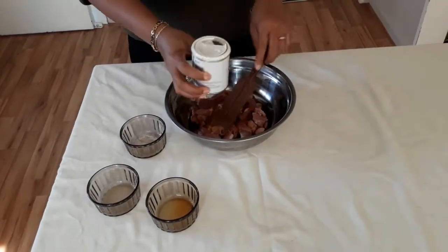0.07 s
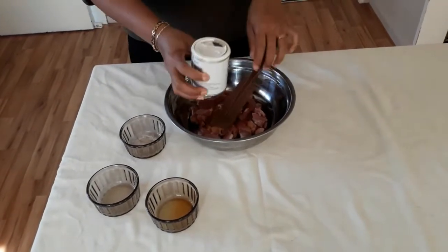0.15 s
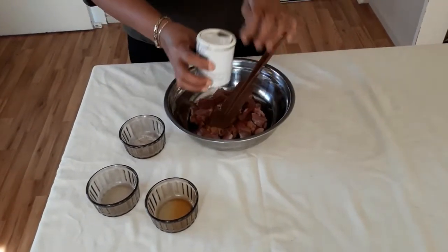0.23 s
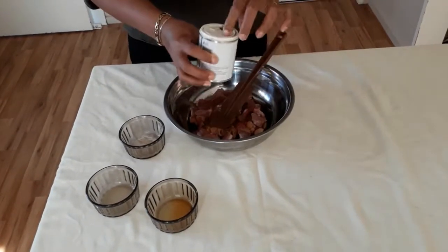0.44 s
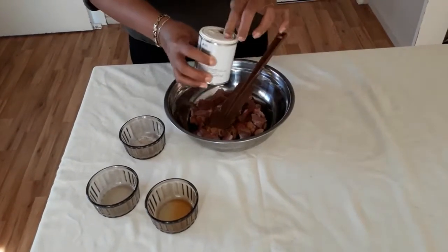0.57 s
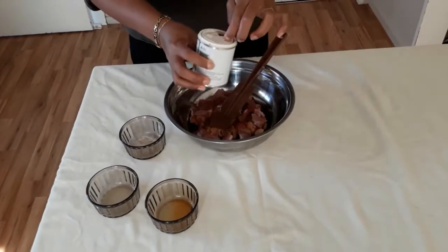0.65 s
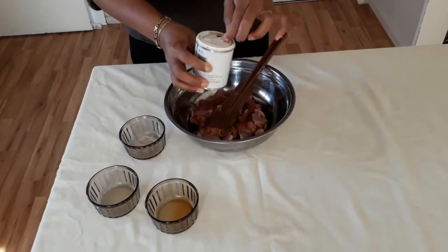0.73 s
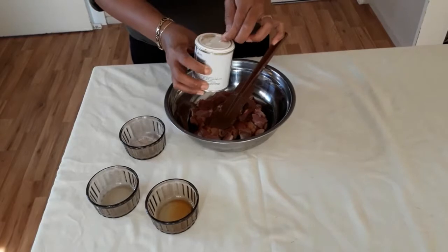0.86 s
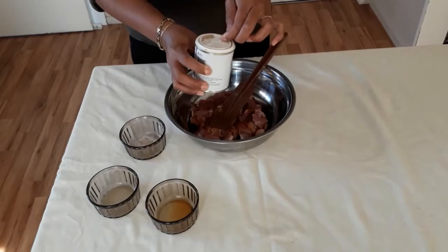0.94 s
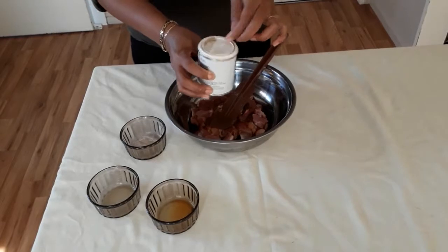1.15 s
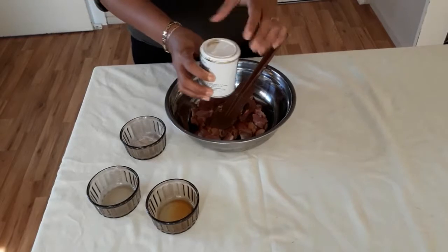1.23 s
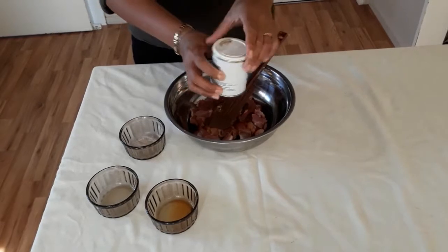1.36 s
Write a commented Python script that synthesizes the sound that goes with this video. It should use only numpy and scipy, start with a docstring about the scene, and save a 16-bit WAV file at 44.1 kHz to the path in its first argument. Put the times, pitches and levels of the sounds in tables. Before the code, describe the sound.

A spatula drops on the rim of a steel bowl with one loud, bright clink and quick rebound, ringing briefly; then a dull hollow knock on a cardboard canister and faint lid scratching in a quiet small kitchen.

```python
"""Spatula on a bowl, hand on a canister

A spatula drops against the rim of a steel bowl: a light touch, a clink and a quick rebound.
Each contact is a noise crack, dense noise clatter and damped modes, some in beating pairs.
A hand knocks on a cardboard canister (noise burst, hollow modes) and scratches its lid (random
slips), which clicks, and pops twice. A small kitchen answers knock and lid over low room noise."""
import sys
import numpy as np
from scipy import signal
from scipy.fft import rfft, irfft
from scipy.io import wavfile

SR = 44100
rng = np.random.default_rng(int(sys.argv[2]) if len(sys.argv) > 2 else 0)


def generate_wav(sig):
    """Save sig (samples, or channels by samples) to the path in sys.argv[1] as 16-bit PCM at SR."""
    pcm = np.round(np.clip(np.atleast_2d(sig).T, -1, 1) * 32767).astype(np.int16)
    wavfile.write(sys.argv[1], SR, pcm)


N = 61739
T = np.arange(N) / SR


def amp(db):
    """Decibels to gain."""
    return 10 ** (np.asarray(db) / 20)


def unit(x):
    """Scales to rms 1."""
    return x / np.sqrt(np.mean(abs(x) ** 2) + 1e-20)


def read(points, hz):
    """Reads a table along a log-frequency axis."""
    f, value = np.transpose(points)
    return np.interp(np.log(hz + 1), np.log(f), value)


def gain_curve(points, outside_db=None):
    """Gain over time from (s, dB) points; holds the end levels unless outside_db is given."""
    return amp(np.interp(T, *np.transpose(points), left=outside_db, right=outside_db))


def delayed(x, s):
    """Starts a sound at time s."""
    return np.concatenate([np.zeros(max(round(s * SR), 0)), x])[:N]


def coloured(x, colour, tilt_db=0):
    """Gives a steady signal a spectrum, tilted in dB per octave, at rms 1."""
    hz = np.fft.rfftfreq(N, 1 / SR)
    gain_db = read(colour, hz) + tilt_db * np.log2(hz + 1)
    return unit(irfft(rfft(x) * amp(gain_db), N))


def noise(colour, tilt_db=0):
    """Coloured noise of rms 1."""
    return coloured(rng.standard_normal(N), colour, tilt_db)


def decay(t60, t=T):
    """Falls by 60 dB in t60 seconds."""
    return np.exp(-np.log(1000) * t / np.maximum(t60, 1e-4))


def dying(x, t60s):
    """Lets each band of a steady signal die at its own speed."""
    hz, t, z = signal.stft(x, SR, nperseg=512, noverlap=384)
    z = z * decay(read(t60s, hz)[:, None], t)
    return signal.istft(z, SR, nperseg=512, noverlap=384)[1][:N]


def rippled(x):
    """Gathers a dense spectrum into narrow random peaks and dips, at rms 1."""
    ripple_db, width_hz = 4.5, 35
    hz = np.fft.rfftfreq(N, 1 / SR)
    knots_hz = np.arange(0, SR / 2, width_hz)
    ripple = np.interp(hz, knots_hz, np.clip(rng.standard_normal(len(knots_hz)), -2, 2))
    return unit(irfft(rfft(x) * amp(ripple_db * ripple), N))


def ring(modes):
    """Damped modes that swell and waver in level and phase as reflections join them."""
    waver_depth, waver_hz = .12, 23.1
    knots_s = np.arange(128) / waver_hz
    out = np.zeros(N)
    for hz, db, t60_s, rise_s in modes:
        a, b = rng.standard_normal((2, len(knots_s)))
        waver = 1 + waver_depth * np.interp(T, knots_s, a + 1j * b)
        tone = (waver * np.exp(2j * np.pi * hz * T)).imag
        out += amp(db) * decay(t60_s) * (1 - np.exp(-T / rise_s)) * tone
    return out


def struck(modes, rise_s):
    """Rings modes that share one rise time."""
    return ring([(*mode, rise_s) for mode in modes])


def bowl():
    """Each contact gives a crack, a dense clatter and the long ring of the steel."""
    # spatula on the rim: t/s, ring/dB, clatter/dB, crack/dB
    clinks = [(0.1691, -47, -30, -64), (.2032, -0.5, 0, 1), (0.2106, -33, -7, 3)]
    # dense upper modes, blurred by the room: f/Hz, relative level/dB per Hz
    clatter_colour = [(25, -61), (60, -37), (140, -12.5), (300, -15.5), (520, -17.5), (800, -5), (1250, 1),
                      (1700, -5.5), (2200, -1.5), (2700, -8), (3200, -9), (3700, 7.5), (4400, -19),
                      (5300, -5.5), (6500, -14), (7400, -9), (7900, -17), (10000, -14), (12000, -22),
                      (14000, -17.5), (16000, -29)]
    # clatter decay: f/Hz, t60/s
    clatter_t60 = [(100, .6), (500, 0.61), (1200, 0.61), (3000, .42), (6000, 0.49), (10000, 0.28),
                   (15000, .27)]
    # the contact itself: f/Hz, relative level/dB per Hz
    crack_colour = [(25, -52), (70, -25), (300, -13.5), (700, -12), (1300, 8.5), (2600, -6.5), (4000, -2),
                    (8000, -33.5), (10300, -14), (12000, -22.5), (15000, -13)]
    # short ping of the first touch, with faint high bowl modes: f/Hz, level/dB, t60/s
    touch = [(1992, -36.5, .055), (5186, -54, .15), (5627, -62, .15), (8088, -65, .13)]
    # bowl rocking on the table: f/Hz, relative level/dB, t60/s, rise/s
    thud = (152, -35, .3, .05)
    clatter_base_db, crack_base_db, crack_t60_s = -22.5, -15.5, 0.0096
    touch_s = .1695
    tone = steel() + ring([thud])
    out = np.zeros(N)
    for s, ring_db, clatter_db, crack_db in clinks:
        clatter = dying(rippled(noise(clatter_colour)), clatter_t60)
        clatter = amp(clatter_base_db + clatter_db) * clatter
        crack = amp(crack_base_db + crack_db) * noise(crack_colour) * decay(crack_t60_s)
        out += delayed(amp(ring_db) * tone + clatter + crack, s)
    return out + delayed(struck(touch, rise_s=0.0015), touch_s)


def steel():
    """Modal ring of the bowl after one contact; its loudest group dips and swells."""
    # modes of the bowl: f/Hz, relative level/dB, t60/s, rise/s
    bowl_modes = [(967, -24.5, .6, .04), (979, -34, .68, .005), (1242, -36, 1.05, .005),
                  (1260, -19.5, .18, .002), (1368, -38, .55, .005), (1486, -25, .14, .002),
                  (1960, -24.5, .34, .003), (2114, -44, .9, .005), (2257, -8, .37, .09),
                  (2278, -34, .56, .005), (2289, -26, .64, .03), (3379, -32, .36, .005),
                  (3439, -21, .38, .005), (3497, -22, .17, .005), (3585, -21, .38, .005),
                  (3596, -9, .27, .008), (3624, -23.5, .72, .005), (4008, -36, .62, .005),
                  (4075, -15.5, .31, .006), (4136, -33, .94, .005), (4183, -32, .36, .005),
                  (4398, -44, .74, .005), (4647, -21, .21, .005), (4734, -27, .49, .01),
                  (4970, -36, .55, .005), (5197, -23, .19, .003), (5219, -42, .75, .005),
                  (5365, -25.5, .44, .005), (5445, -43, .75, .005), (5607, -33, .28, .005),
                  (5933, -46, .68, .005), (6025, -36, .33, .005), (6115, -33, .44, .005),
                  (6280, -41, .55, .005), (6485, -46, .7, .005), (6826, -39, .46, .005),
                  (7270, -33, .3, .005), (7760, -50, .66, .005), (10015, -56, .65, .005)]
    # gain of the loudest group: t/s after contact, level/dB
    swell = [(0, -1.5), (.036, 2.5), (.05, -1.5), (.061, -2.5), (.071, 4), (.078, 6.5), (.088, -6),
             (.11, 2)]
    low_hz, high_hz = 3300, 3700
    loudest = [mode for mode in bowl_modes if low_hz < mode[0] < high_hz]
    others = [mode for mode in bowl_modes if mode not in loudest]
    return ring(loudest) * gain_curve(swell) + ring(others) + shimmer()


def shimmer():
    """Many weak high modes that outlast the clatter."""
    low_hz, high_hz = 4400, 8200
    base_db, tilt_db_per_octave, t60_s, rise_s = -45, -18, 0.564, 0.0062
    hz = np.geomspace(low_hz, high_hz, num=40)
    detune, level, length = rng.uniform(-1, 1, (len(hz), 3)).T
    db = base_db + tilt_db_per_octave * np.log2(hz / low_hz) + 4 * level
    return struck(zip(hz * (1 + 0.0024 * detune), db, t60_s * (1 + .2 * length)), rise_s)


KNOCK_S = .4387


def knock():
    """A dull blow on the canister: a short burst of coloured noise."""
    # blow: f/Hz, relative level/dB per Hz
    knock_colour = [(25, -55), (80, -10), (190, -2.5), (350, 1), (600, 7.5), (1000, -11), (1500, 3),
                    (2300, -3), (3200, -6), (6000, -36), (9000, -32), (14000, -34)]
    level_db, rise_s, t60_s = -23, 0.0016, 0.028
    shape = (1 - np.exp(-T / rise_s)) * decay(t60_s)
    return delayed(amp(level_db) * noise(knock_colour) * shape, KNOCK_S)


def hollow():
    """The canister's short hollow notes, after the blow and when its lid flexes."""
    # modes of the canister: f/Hz, level/dB, t60/s
    can_modes = [(215.4, -57, 0.114), (330.7, -48.5, 0.22), (565, -36.5, 0.21), (608.7, -41, .45),
                 (635, -40, 0.33)]
    # modes of the lid: f/Hz, relative level/dB, t60/s
    pop_modes = [(207, -55, 0.33), (677, -50, 0.093), (774, -45, .09), (903, -43.5, .1), (1975, -48, 0.093)]
    # lid is pressed, then gives way: t/s, level/dB
    pops = [(.679, -1), (0.9626, 0)]
    pop = struck(pop_modes, rise_s=0.0056)
    can = delayed(struck(can_modes, rise_s=0.0065), KNOCK_S)
    return can + sum(amp(db) * delayed(pop, s) for s, db in pops)


def lid():
    """Tiny slips of a fingernail on the lid, and a few larger clicks."""
    # scratching: t/s, level/dB
    scratch = [(.676, -59), (.681, -49), (.71, -51), (.745, -49), (.765, -57.5), (.80, -62.5), (.84, -54),
               (.87, -59.5), (.92, -58), (.95, -53.5), (.99, -72), (1.015, -82), (1.06, -92)]
    # colour of the lid: f/Hz, relative level/dB per Hz
    lid_colour = [(30, -50), (100, -49), (280, 1), (480, -5), (750, 2.5), (1200, -2), (1630, 3.5),
                  (2000, -3.5), (2900, -11), (3800, -3.5), (5200, -15), (6700, -13), (8200, -22.5),
                  (9800, -16), (11500, -23), (13400, -20), (16000, -23.5)]
    # clicks: t/s, level/dB, rise/s, t60/s, tilt/dB per octave
    snaps = [(0.585, -72, .002, 0.052, 11), (0.6784, -45.5, .001, 0.042, -4.5),
             (.696, -61, 0.003, .015, -1), (0.7475, -49, 0.00059, 0.016, -0.5),
             (.8757, -41, 0.00051, 0.042, 0.5), (0.9607, -39, 0.0027, 0.027, -0.5)]
    grains_per_s, spread_db = 2600, 3.6
    size = amp(spread_db * np.minimum(rng.exponential(1, N), 4))
    slips = size * rng.choice([-1, 1], N) * (rng.random(N) < grains_per_s / SR)
    out = coloured(slips, lid_colour) * gain_curve(scratch, -120)
    for s, db, rise_s, t60_s, tilt_db in snaps:
        shape = np.minimum(T / rise_s, 1) * decay(t60_s, np.maximum(T - rise_s, 0))
        out += delayed(amp(db) * noise(lid_colour, tilt_db) * shape, s)
    return out


def handling():
    """Low rustle of the canister turning in the hand, and the faint rub of reaching fingers."""
    # rustle: t/s, level/dB
    rustle_level = [(.66, -89), (.71, -63.5), (.84, -59), (.98, -63), (1.05, -74), (1.09, -59.5),
                    (1.16, -75), (1.27, -69.5), (1.4, -80)]
    # rustle: f/Hz, relative level/dB per Hz
    rustle_colour = [(80, -36), (210, 1.5), (340, 3), (520, -21.5), (1500, -26), (5000, -42.5)]
    # rub: t/s, level/dB
    rub_level = [(.45, -95), (.51, -75), (.59, -72), (.66, -77), (.69, -95)]
    # rub: f/Hz, relative level/dB per Hz
    rub_colour = [(500, -28), (3000, -4.5), (7000, 0), (10000, 1), (14000, -1), (16000, -8)]
    rustle = noise(rustle_colour) * gain_curve(rustle_level)
    rub = noise(rub_colour) * gain_curve(rub_level, -120)
    return rustle + rub


def kitchen(x):
    """Adds the short diffuse tail of the room: convolution with decaying noise."""
    # room decay: f/Hz, t60/s
    room_t60 = [(100, 0.34), (600, 0.506), (3000, 0.41), (8000, 0.47), (15000, 0.51)]
    tail_db, delay_s = -3.5, .006
    tail = delayed(dying(rng.standard_normal(N), room_t60), delay_s)
    return x + amp(tail_db) * signal.fftconvolve(x, tail / np.linalg.norm(tail))[:N]


def room_noise():
    """Low steady noise of the room."""
    # room noise: f/Hz, relative level/dB per Hz
    floor_colour = [(15, -56.5), (25, -9.5), (70, -13.5), (102, -5.5), (206, -11.5), (293, -7.5),
                    (326, -18), (373, 1), (416, -9), (451, -12.5), (754, -18), (1520, -17), (1790, -21),
                    (4030, -27), (16000, -41.5)]
    return amp(-63) * noise(floor_colour)


def scene():
    """Bowl and canister with lows below about 95 Hz cut, over the room noise."""
    objects = bowl() + kitchen(knock() + lid()) + hollow() + handling()
    # against low bursts from abrupt noise envelopes
    low_cut = signal.butter(N=4, Wn=95, btype="high", fs=SR, output="sos")
    return (signal.sosfilt(low_cut, objects) + room_noise())[None]


def record(dry):
    """The recorder's band limit."""
    edge_hz = 15850
    lowpass = signal.firwin(401, edge_hz, window=("kaiser", 8), fs=SR)
    return signal.oaconvolve(dry, lowpass[None], "same")


dry = scene()
out = record(dry)
generate_wav(out)
```